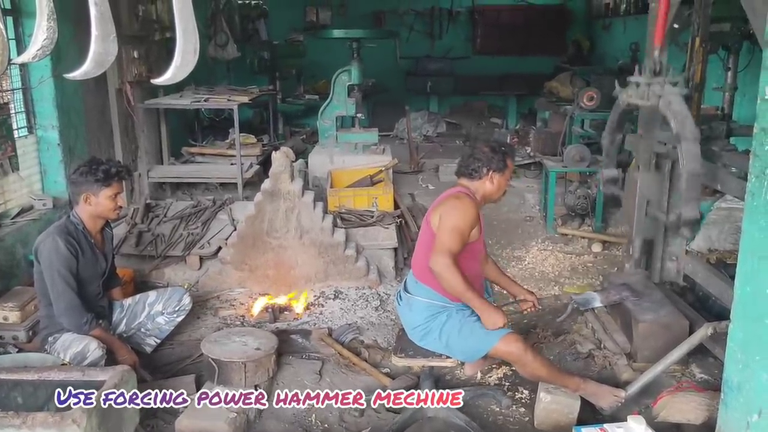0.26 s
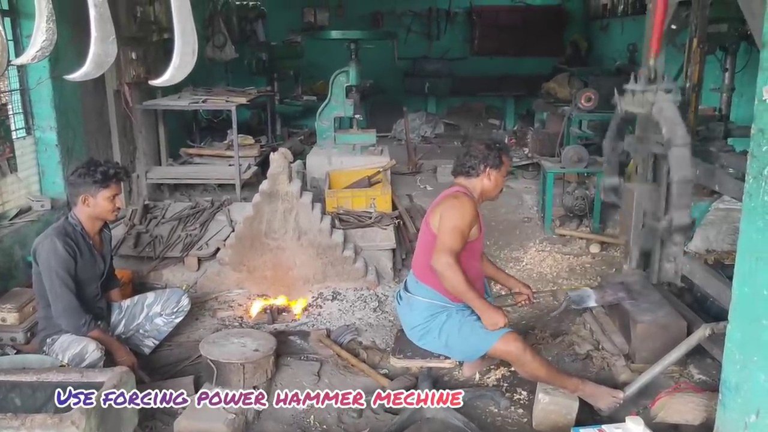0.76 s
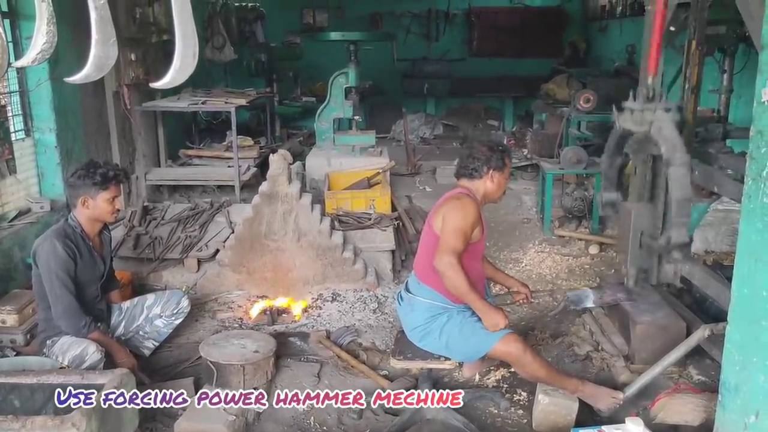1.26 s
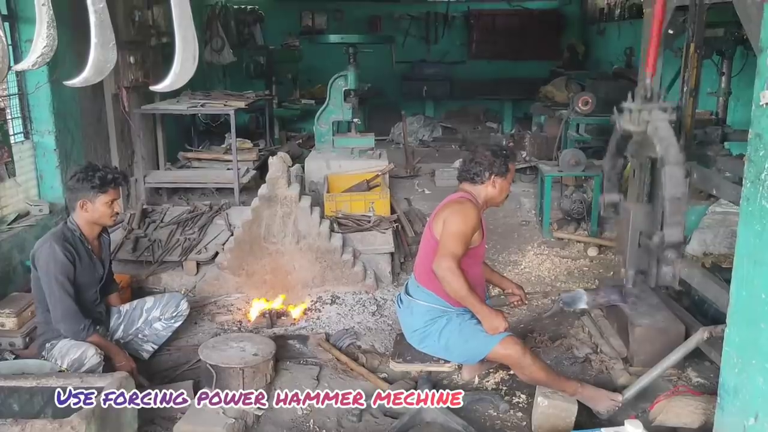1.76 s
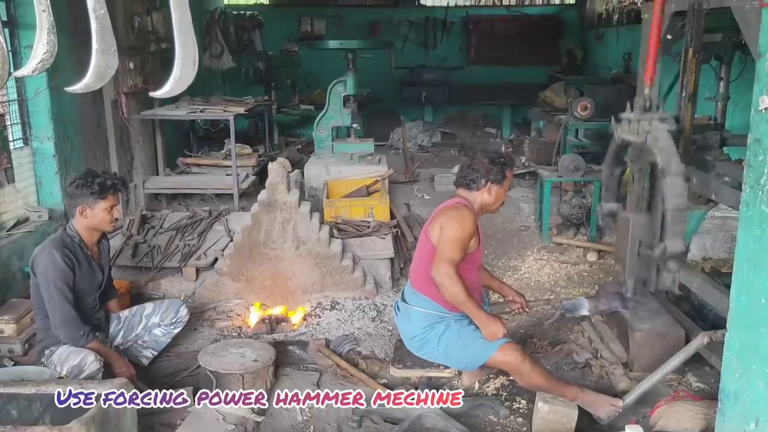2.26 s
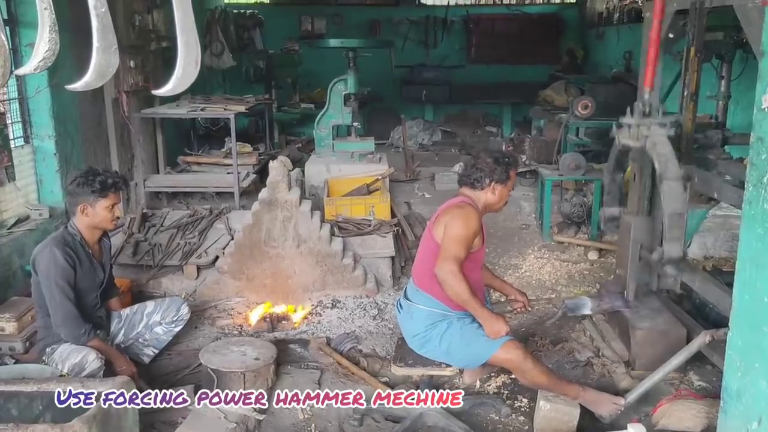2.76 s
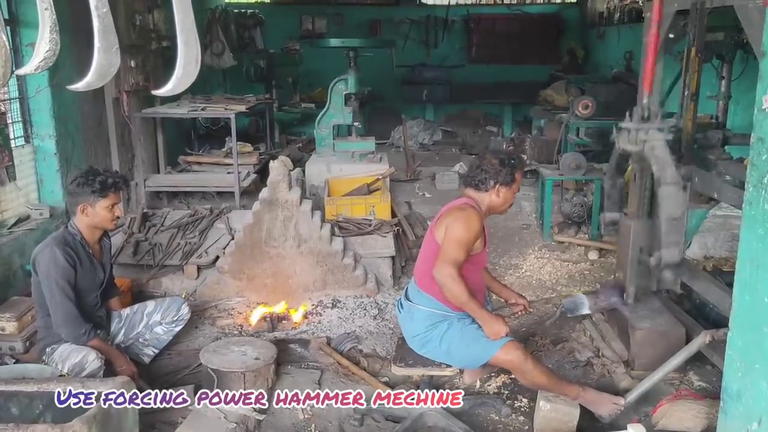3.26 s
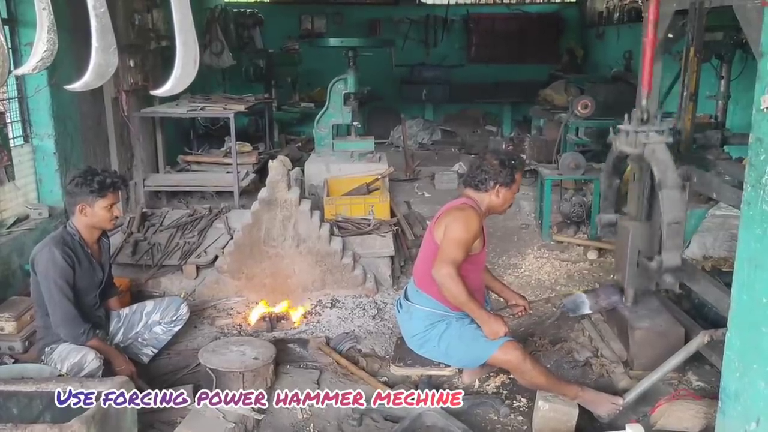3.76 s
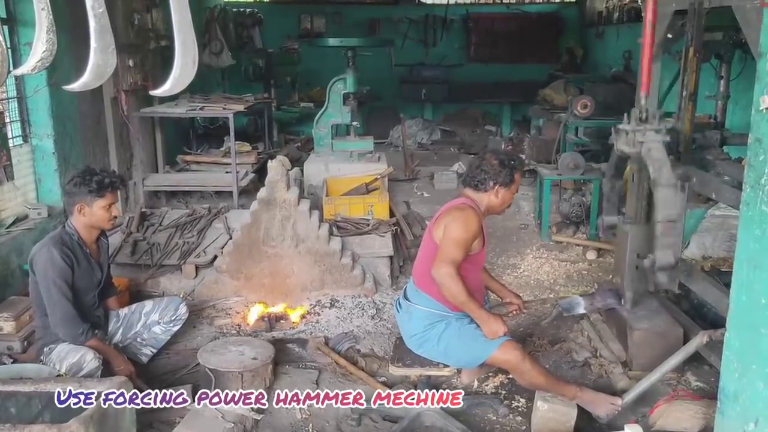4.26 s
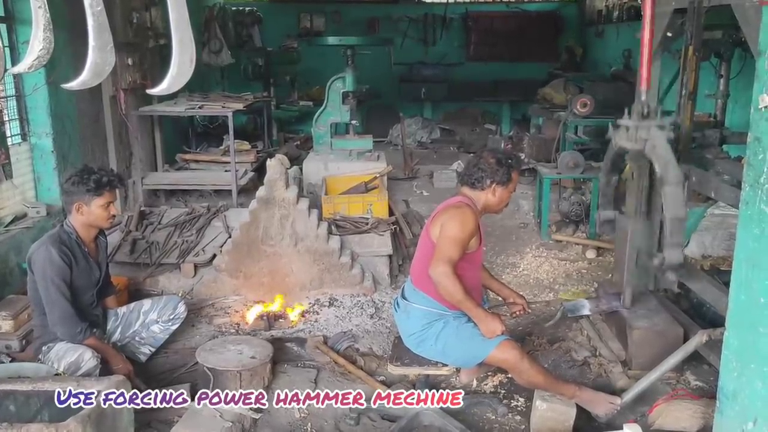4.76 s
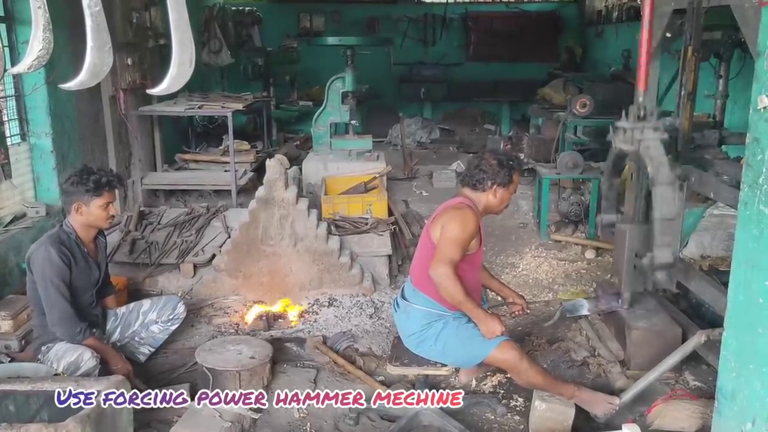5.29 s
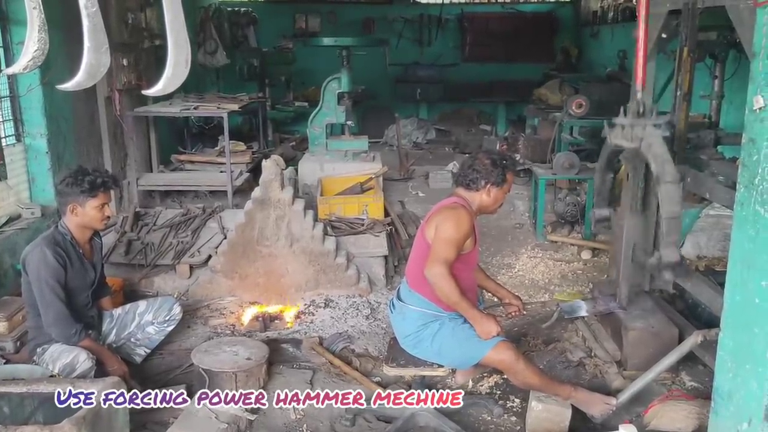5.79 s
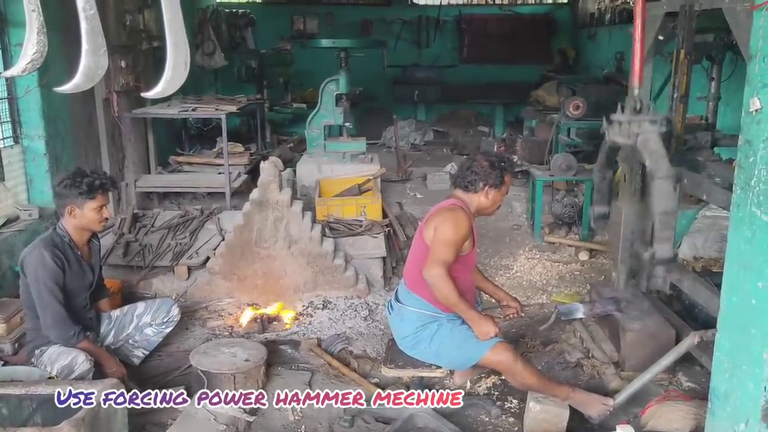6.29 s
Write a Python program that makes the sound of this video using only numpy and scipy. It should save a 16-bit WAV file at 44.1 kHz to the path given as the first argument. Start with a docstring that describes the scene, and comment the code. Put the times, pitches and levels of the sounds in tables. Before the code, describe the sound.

Regular heavy hammer blows on steel, roughly half a second apart, each a sharp crack, low boom and bright metallic ring fading quickly in a small workshop. Light clacks lead the blows; dull knocks and clanks fall between them. The machine's drive rumbles and rattles throughout, while a slipping belt gives brief falling squeaks. Near the end tongs touch steel once. A modest band-limited stereo microphone squashes the loud impacts.

```python
"""Heavy thuds, about two a second, each with a clash and ring of steel: a power hammer forges in a small smithy.
Blows and loose knocks are coloured noise dying away, plus ringing sine modes on the blows; the anvil block rocks.
The slack linkage clacks before each blow, and tongs touch steel once. The belt squeaks in gliding sines.
The drive rumbles and hisses as noise that follows the crank. A fast limiter flattens the head of every blow."""
import sys
import numpy as np
from scipy import signal
from scipy.fft import rfft, irfft, next_fast_len
from scipy.io import wavfile
from scipy.ndimage import uniform_filter1d

SR = 44100
rng = np.random.default_rng(int(sys.argv[2]) if len(sys.argv) > 2 else 0)


def store_wav(level_fs):
    """Save 16-bit WAV to argv[1]."""
    pcm = np.round(np.clip(np.atleast_2d(level_fs), -1, 1) * 32767)
    wavfile.write(sys.argv[1], SR, pcm.T.astype(np.int16))


N = 287973
TIME = np.arange(N) / SR       # the whole scene, s
AGE = np.arange(40000) / SR    # time since the start of one sound, s

# strokes of the ram, levels before each layer's trim:
# (blow [s], force [dB], die ring [dB], ring of the bar [dB], linkage clack [dB])
BLOWS = [(0.151, -30, -53, -41.5, -45.5), (0.679, -30, -33.5, -38, -43.5), (1.21, -30, -35, -52, -45.5),
         (1.734, -33.5, -31.5, -40, -40.5), (2.254, -33, -29.5, -58, -41.5), (2.776, -32, -29.5, -54, -40),
         (3.305, -34, -27, -53, -50), (3.826, -35, -44, -57, -40.5), (4.351, -33, -57, -42, -43),
         (4.875, -30.5, -29, -42, -39.5), (5.396, -31.5, -26.5, -61, -41.5), (5.918, -35, -39, -37, -43.5),
         (6.441, -32, -27, -57, -45)]
# colour of the iron frame: (frequency [Hz], relative density [dB per Hz])
FRAME = [(21, -42.5), (35, -14), (59, -17.5), (118, -5.5), (253, -6.5), (301, -3.5), (404, -3.5), (444, -8),
         (495, -2), (606, -7.5), (790, -2), (982, -7.5), (1080, -6), (1340, -17.5), (1450, -15.5),
         (1880, -50.5), (3190, -120)]
# colour of the steel dies: (frequency [Hz], relative density [dB per Hz])
DIES = [(900, -40.5), (1400, -16.5), (1700, -2.5), (1950, -8), (2500, -7), (3000, -12), (5300, -8.5),
        (5800, -3.5), (6600, 3), (7100, 3), (7500, 0.5), (8000, -21.5)]
# left-right likeness of the blows, which shake the ground: (frequency [Hz], likeness [-1 to 1])
BLOW_LIKENESS = [(40, .1), (130, .25), (260, .52), (420, .72), (800, .6), (1300, .12), (2300, .15),
                 (3500, 0), (8000, .05)]


def from_db(db):
    """Decibels to gain."""
    return 10 ** (np.asarray(db) / 20)


def rms_one(x):
    """Scale to rms 1."""
    return x / np.sqrt(np.mean(x ** 2) + 1e-20)


def at_hz(points, hz):
    """Read a table on a log-frequency axis."""
    table = np.array(points)
    return np.interp(np.log(np.maximum(hz, 1)), np.log(table[:, 0]), table[:, 1])


def add(out, s, sound):
    """Mix a sound in from time s on, cutting what falls outside the scene."""
    at = round(s * SR)
    first, last = max(at, 0), min(at + sound.shape[-1], N)
    if first < last:
        out[..., first:last] += sound[..., first - at:last - at]


def drift(rate, t):
    """Random wander around 0: normal draws, rate of them per unit of t, joined by straight lines."""
    return np.interp(t * rate, np.arange(4096), rng.standard_normal(4096))


def swell(seconds):
    """Rise of a sound that takes a moment to build up."""
    return 1 - np.exp(-AGE / seconds)


def hump(x, centre, width):
    """A smooth rise to 1 and back."""
    return np.exp(-((x - centre) / width) ** 2)


def noise(spectrum, size=len(AGE), clump_db=0, likeness=None):
    """Coloured stereo noise with a set left-right likeness, its energy clumped into resonances; rms 1."""
    # left-right likeness of all but the ground-shaking blows: (frequency [Hz], likeness [-1 to 1])
    machine_likeness = [(40, .55), (150, 1), (400, 0.9), (800, 0.65), (1300, 0.013), (2300, 0.13),
                        (3500, 0.028), (8000, 0.041)]
    if likeness is None:
        likeness = machine_likeness
    padded = next_fast_len(size, True)
    hz = np.fft.rfftfreq(padded, 1 / SR)
    mid, side = rfft(rng.standard_normal((2, padded)))
    alike = np.clip(at_hz(likeness, hz), -1, 1)
    pair = np.sqrt(1 + alike) * mid + np.sqrt(1 - alike) * side * [[1], [-1]]
    low_skirt = hz / (hz + spectrum[0][0] / 2)
    high_skirt = 1 / (1 + (hz / spectrum[-1][0]) ** 8)
    clumps = clump_db * drift(2, np.sqrt(hz))   # clumps widen toward the treble
    colour = from_db(at_hz(spectrum, hz) + clumps) * low_skirt * high_skirt
    return rms_one(irfft(pair * colour)[:, :size])


def die_away(dense_modes, length):
    """A struck body with countless modes: every frequency region fades at its own rate."""
    # dying away of machine and room together, scaled by length: (frequency [Hz], t60 at length 1 [s])
    tail = [(60, 0.26), (200, 0.56), (800, 0.61), (2000, 0.51), (4000, 0.48), (7000, 0.34)]
    hz = np.fft.rfftfreq(len(AGE), 1 / SR)
    spectrum = rfft(dense_modes)
    centres, t60s = np.transpose(tail)
    out = 0
    for share, t60 in zip(np.eye(len(tail)), t60s):
        band = irfft(spectrum * at_hz(np.c_[centres, share], hz))
        out = out + band * from_db(-60 * AGE / (t60 * length))
    return out


def ring(modes, scatter_db):
    """Single decaying modes of random strength and phase, out of step between channels by their likeness."""
    out = 0
    for hz, db, t60 in modes:
        alike = np.clip(at_hz(BLOW_LIKENESS, hz), -1, 1)
        apart = np.arccos(alike) * rng.choice([-1, 1])
        phase = rng.uniform(0, 2 * np.pi) + np.array([[0], [apart]])
        level = from_db(db + scatter_db * rng.standard_normal() - 60 * AGE / t60)
        out = out + np.sin(2 * np.pi * hz * AGE + phase) * level
    return out


def delay_left(x, left_db, count=4):
    """Direct sound reaches the left channel a few samples after the right, at its own level."""
    late = np.r_[np.zeros(count), x[:-count]]
    return np.array([late * from_db(left_db), x])


def hammer(thud_db=7.5, clash_db=11.0, ring_db=1.5, bar_db=-2.5, crack_db=6.5, same=0.33):
    """Each blow: a crack at the dies, their clash and ring, the bar's note and the boom of the frame."""
    # ringing of the dies: (frequency [Hz], relative level [dB], t60 [s])
    die_modes = [(4625, -12, .36), (4931, -12.5, .38), (5550, -19, .7), (6790, -7, .36), (6992, 6, .32),
                 (7045, -7, .32), (7432, -8, .28)]
    # ringing of the frame: (frequency [Hz], relative level [dB], t60 [s])
    frame_modes = [(130.3, -18, 0.44), (162, -12.5, 0.22), (309.2, -14, 0.79), (341.4, -20, 0.79),
                   (499, -13, 0.35), (757, -16.5, 0.62), (793, -18, 0.5), (1103, -16.5, 0.63)]
    # note of the held bar: (frequency [Hz], relative level [dB], t60 [s])
    bar_modes = [(2172, -5, .7), (2243, 0, .7)]
    out = np.zeros((2, N))
    shared = noise(FRAME, likeness=BLOW_LIKENESS)   # part of the frame's response returns on every blow
    for s, force, die_ring, bar_ring, _ in BLOWS:
        fresh = noise(FRAME, clump_db=3.5, likeness=BLOW_LIKENESS)
        boom = die_away(np.sqrt(same) * shared + np.sqrt(1 - same) * fresh, length=0.85)
        boom = (boom + ring(frame_modes, scatter_db=0.5)) * swell(0.0022)

        flutter = from_db(0.31 * drift(130, AGE))
        clash = die_away(noise(DIES, clump_db=3.0), length=0.97) * flutter * swell(0.0032)
        crack = delay_left(noise(DIES)[0] * from_db(-60 * AGE / 0.015), left_db=-10.0)

        die_notes = from_db(die_ring + ring_db) * ring(die_modes, scatter_db=1.0)
        bar_note = from_db(bar_ring + bar_db) * ring(bar_modes, scatter_db=1.0)

        add(out, s, from_db(force + thud_db) * boom)
        add(out, s, from_db(force + clash_db) * clash)
        add(out, s, from_db(force + crack_db) * crack)
        add(out, s, (die_notes + bar_note) * swell(0.0011))
    return out


def anvil(punch_db=15.0, ground_db=4.0, rock_s=0.068, loss_db=9.5, count=4):
    """The anvil block punches its bed, then rocks on the ground a few times, weaker each time."""
    # colour of the block punching its bed: (frequency [Hz], relative density [dB per Hz])
    punch_colour = [(45, -15.5), (80, -13), (130, -1), (240, -2.5), (380, -2), (600, -9), (1000, -19)]
    # colour of the ground under the rocking block: (frequency [Hz], relative density [dB per Hz])
    ground_colour = [(30, -25), (60, -11), (95, 2.5), (135, 3.5), (200, -12.5)]
    out = np.zeros((2, N))
    for s, force, *_ in BLOWS:
        level = from_db(force + punch_db - 60 * AGE / 0.091) * swell(0.0061) ** 2
        add(out, s, level * noise(punch_colour, likeness=BLOW_LIKENESS))
        for k in range(count):
            level = from_db(force + ground_db - k * loss_db - 60 * AGE / 0.15) * swell(0.0096) ** 2
            add(out, s + k * rock_s, level * noise(ground_colour, likeness=BLOW_LIKENESS))
    return out


def linkage(clack_db=0.5, lead_s=.0705):
    """Pins hit the ends of their play as the slack is taken up, lead_s before the ram lands."""
    out = np.zeros((2, N))
    for s, *_, clack in BLOWS:
        steel = from_db(clack + clack_db) * noise(DIES, clump_db=3.0)
        add(out, s - lead_s, die_away(steel, length=0.54) * swell(0.00087))
    return out


def tongs(at_s=6.3237, level_db=-29, body_db=-11.5):
    """One light touch of steel on steel: a bright edge over a weaker, die-coloured body."""
    # colour of the bright edge: (frequency [Hz], relative density [dB per Hz])
    edge_colour = [(3500, -24), (5500, -16), (6500, 1.5), (7400, -6), (8000, -25)]
    out = np.zeros((2, N))
    steel = noise(edge_colour) + from_db(body_db) * noise(DIES, clump_db=3.5)
    add(out, at_s, from_db(level_db) * die_away(steel, length=0.57) * swell(0.0011))
    return out


def knocks(thud_db=-4.5, clink_db=4.5):
    """Light contacts of loose iron and the work: a dull knock and a clank that build up in a moment."""
    # contacts between blows, levels before the trims: (time [s], thud [dB], clink [dB])
    contacts = [(0.473, -40, -56.5), (1.544, -38, -50.5), (2.438, -44, -60), (2.978, -38, -51.5),
                (3.637, -40, -51), (4.023, -36, -55.5), (4.117, -49.5, -54), (4.68, -41, -53.5),
                (5.723, -41, -54.5), (6.199, -50.5, -53.5)]
    # (frequency [Hz], relative density [dB per Hz])
    clank_colour = [(700, -17.0), (1300, -8.5), (1800, 3.0), (2500, 1.0),
                    (3200, -6.5), (5200, -8), (6600, 0.5), (7800, -17.0)]
    out = np.zeros((2, N))
    for s, thud, clink in contacts:
        dull = from_db(thud + thud_db) * noise(FRAME, clump_db=6.5)
        clank = from_db(clink + clink_db) * noise(clank_colour, clump_db=5.0)
        add(out, s, die_away(dull + clank, length=0.76) * swell(0.0028))
    return signal.sosfilt(signal.butter(2, 260, "high", fs=SR, output="sos"), out)


def glide(first_hz, last_hz, length):
    """A slipping belt's pitch moves fast at first and levels out."""
    return last_hz + (first_hz - last_hz) * (1 - np.clip(AGE / length, 0, 1)) ** 2


def slip_phase(hz, rough):
    """Stick-slip vibration never holds its pitch exactly."""
    return 2 * np.pi * np.cumsum(hz * (1 + rough * drift(600, AGE))) / SR


def smithy(x, wet_db, t60):
    """Direct sound and the dense echoes of the workshop, made of decaying noise."""
    echoes = rng.standard_normal((2, len(AGE))) * from_db(-60 * AGE / t60) * swell(0.0092)
    echoes = rms_one(echoes) / np.sqrt(len(AGE))
    wet = signal.fftconvolve(x[None], echoes, axes=1)[:, :N]
    return delay_left(x, left_db=1.5) + from_db(wet_db) * wet


def belt(chirp_db=-1.0, edge_db=-6.5):
    """The belt slips on its pulley: a broken squeak falls to a steady note, bites with dry rubbing, lets go."""
    # the belt joint comes round and squeaks: (time [s], length of the glide [s], relative level [dB])
    laps = [(-.03, 0.25, 1), (1.474, .24, 0.5), (2.979, 0.22, 0.5), (4.485, .205, 1.5), (6.018, 0.21, 2.5)]
    # higher squeaks, before the trim: (time [s], length [s], first pitch [Hz], last pitch [Hz], level [dB])
    chirps = [(1.095, 0.24, 4370, 4020, -45), (1.45, 0.073, 4360, 3920, -55),
              (2.943, 0.095, 4480, 3850, -49), (3.77, 0.092, 4650, 4500, -46),
              (5.303, 0.13, 4074, 4160, -46), (5.768, .14, 4260, 3860, -46.5)]
    # (frequency [Hz], relative density [dB per Hz])
    scrape_colour = [(5600, -26.5), (6350, -12.5), (6800, -2.5), (7150, -10.5), (7700, -34)]
    first_hz, last_hz = 3660, 3090
    attack_s, release_db_per_s = .012, 479.5
    bite_at, bite_width = 0.79, 0.28   # shares of the glide
    tone_db, tone_bite_db, octave_db = -58, 11, -51.5
    rub_db, rub_bite_db = -59, 14

    tones, rubbing = np.zeros(N), np.zeros((2, N))
    for s, length, db in laps:
        hz = glide(first_hz, last_hz, length)
        bite = hump(AGE / length, bite_at, bite_width)
        level = from_db(db - release_db_per_s * np.maximum(AGE - length, 0)) * swell(attack_s)
        phase = slip_phase(hz, rough=.016 - .009 * bite)   # the note steadies as the belt bites
        # the belt's edge squeals higher and rougher
        edge = from_db(edge_db) * np.sin(slip_phase(hz * 1.16, rough=.045))
        voice = from_db(tone_db + tone_bite_db * bite) * (np.sin(phase) + edge)
        octave = from_db(octave_db) * np.sin(2 * phase)
        add(tones, s, level * (voice + octave))
        scrape = noise(scrape_colour, clump_db=6.5)
        add(rubbing, s, level * from_db(rub_db + rub_bite_db * bite) * scrape)

    for s, length, start_hz, end_hz, db in chirps:
        phase = slip_phase(glide(start_hz, end_hz, length), rough=.024)
        arch = np.sin(np.pi * np.clip(AGE / length, 0, 1))
        add(tones, s, from_db(db + chirp_db) * arch * np.sin(phase))

    grip = from_db(3.0 * drift(160, TIME))   # uneven grip breaks up the squeaks
    return smithy(tones * grip, wet_db=-3.0, t60=.24) + rubbing


def crank():
    """Rise and fall in dB of rumble and hiss over each turn of the crank, timed from the blow."""
    landings = np.array(BLOWS)[:, 0]
    landings = np.r_[2 * landings[0] - landings[1], landings]   # one more blow before the scene starts
    since = TIME - landings[np.searchsorted(landings, TIME) - 1]
    shake = np.exp(-since / 0.14)         # the frame shakes
    lift = hump(since, 0.292, .05)        # the rising ram rattles
    lull = hump(since, 0.423, 0.048)      # it hangs at the top
    fall = hump(since, 0.49, .07)         # it slides down
    rumble = 5.5 * shake - 1 * lift - 6.5 * lull
    hiss = 4.5 * lift - 5.5 * lull + 6 * fall
    return rumble, hiss


def chatter(per_s, t60):
    """Loudness of many small random contacts, each dying away in the room; rms 1."""
    ticks = (rng.random(N) < per_s / SR) * rng.uniform(.3, 1.7, N)
    keep = from_db(-120 / (t60 * SR))   # power falls 60 dB in t60
    steady = per_s / SR / (1 - keep)    # start as if already running
    power, _ = signal.lfilter([1], [1, -keep], ticks, zi=[steady])
    return rms_one(np.sqrt(power + 1e-12))


def drive(rumble_db=0.5, hiss_db=-3.0):
    """Shaft, pulleys and ram guides rumble and hiss unevenly, with a lull as the ram turns over at the top."""
    # the drive under changing load, before trims and crank: (time [s], rumble [dB], hiss [dB])
    load = [(0.0, -50, -51.5), (0.42, -50.5, -57.5), (1.64, -53, -53), (2.67, -51.5, -59.5),
            (2.98, -55.5, -55.5), (3.75, -52, -56), (4.97, -52.5, -57.5), (5.22, -54, -56.5),
            (6.02, -50.5, -52.5), (6.53, -52.5, -57)]
    # colour of the rumble: (frequency [Hz], relative density [dB per Hz])
    rumble_colour = [(25, -15.5), (55, -16.5), (90, -3), (125, 3), (220, -3), (330, 0.5), (520, 1),
                     (630, -5), (790, 0), (1100, -3), (1350, -14.5), (1800, -7), (3000, -28)]
    # colour of the hiss: (frequency [Hz], relative density [dB per Hz])
    hiss_colour = [(900, -6.5), (1800, 1), (2500, 4), (3200, 0.5), (5200, 0), (6000, 3), (6800, 6.5),
                   (7500, 5), (8000, -28.5)]
    s, *columns = np.transpose(load)
    load_rumble, load_hiss = [np.interp(TIME, s, c) for c in columns]
    crank_rumble, crank_hiss = crank()
    rattle = drift(45, TIME)
    rumble_level = from_db(load_rumble + crank_rumble + rumble_db + 4.7 * rattle)
    hiss_level = from_db(load_hiss + crank_hiss + hiss_db + 1.0 * rattle) * chatter(per_s=80, t60=.2)
    rumble = rumble_level * noise(rumble_colour, size=N, clump_db=1.5)
    hiss = hiss_level * noise(hiss_colour, size=N, clump_db=1.5)
    return rumble + hiss


def scene():
    """The whole machine at work."""
    return hammer() + anvil() + linkage() + tongs() + knocks() + belt() + drive()


def limiter(x, ceiling_db, release_db_per_s, window_s):
    """The gain drops at once when the short-term level passes the ceiling and recovers at a steady rate."""
    power = uniform_filter1d(np.mean(x ** 2, axis=0), max(int(window_s * SR), 1))
    over = np.maximum(10 * np.log10(np.abs(power) + 1e-12) - ceiling_db, 0)
    recovery = release_db_per_s * TIME
    held = np.maximum.accumulate(over + recovery) - recovery
    return x * from_db(-held)


def record(dry):
    """A narrow-band microphone, then a limiter with a sudden grip, then a steep cut of the top."""
    microphone = signal.ellip(8, .3, 70, 7850, fs=SR, output="sos")   # top at 7850 Hz
    heard = signal.sosfilt(microphone, dry)
    limited = limiter(heard, ceiling_db=-26.0, release_db_per_s=180.5, window_s=0.0023)
    top_cut = signal.ellip(8, .3, 60, 16000, fs=SR, output="sos")     # cut at 16 kHz
    return signal.sosfilt(top_cut, limited)


dry = scene()
out = record(dry)
store_wav(out)
```